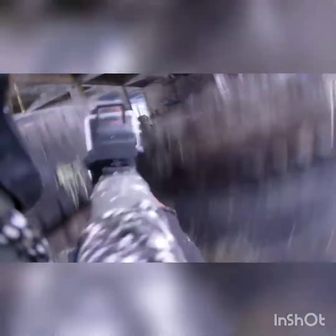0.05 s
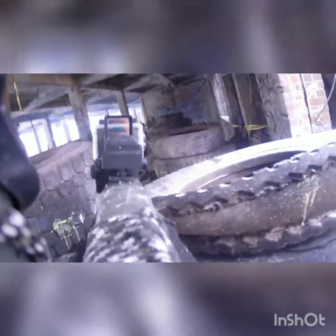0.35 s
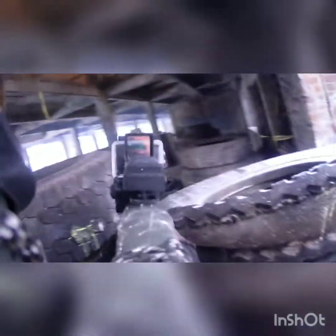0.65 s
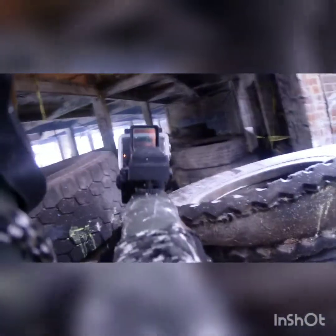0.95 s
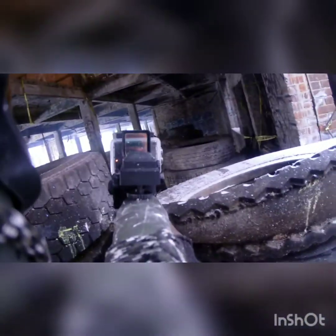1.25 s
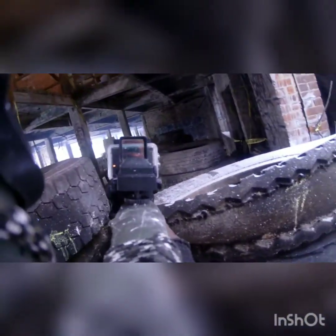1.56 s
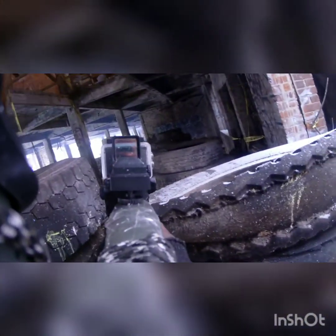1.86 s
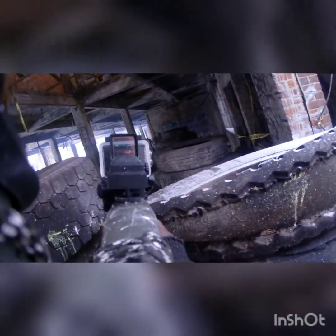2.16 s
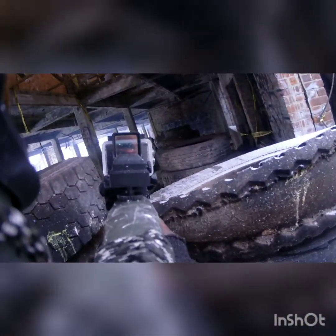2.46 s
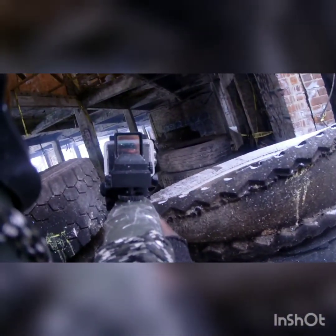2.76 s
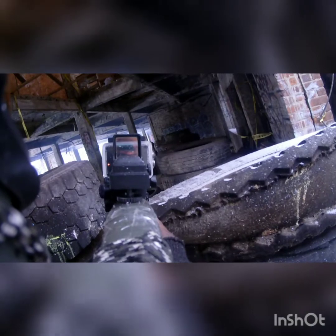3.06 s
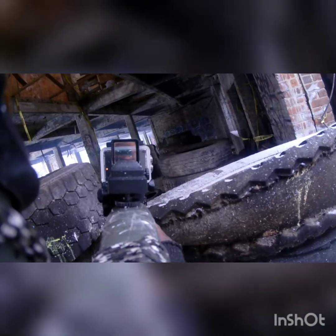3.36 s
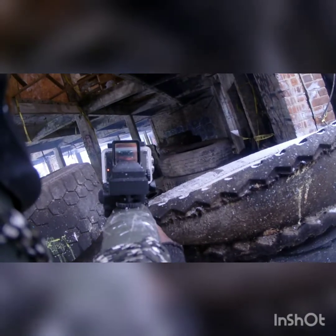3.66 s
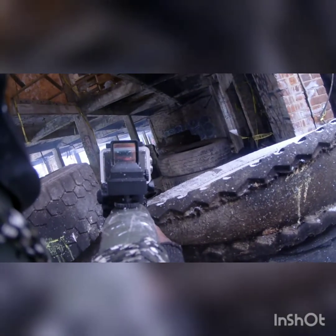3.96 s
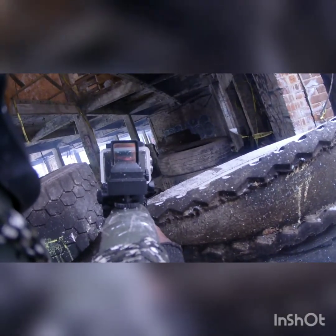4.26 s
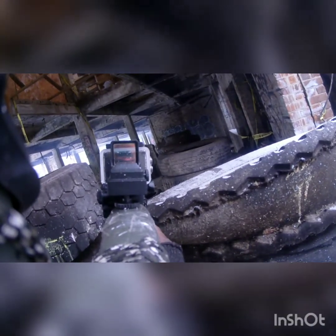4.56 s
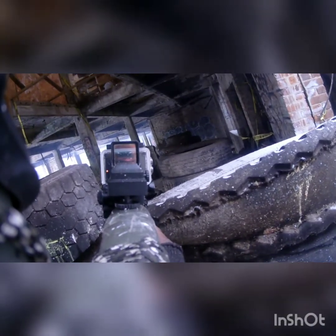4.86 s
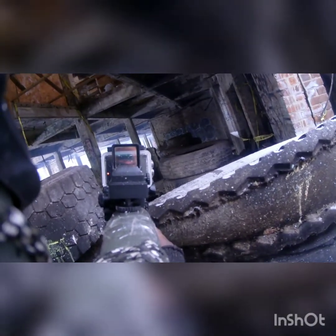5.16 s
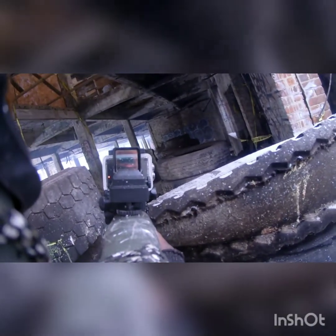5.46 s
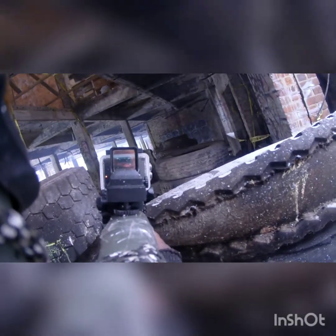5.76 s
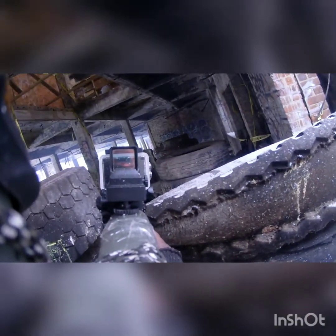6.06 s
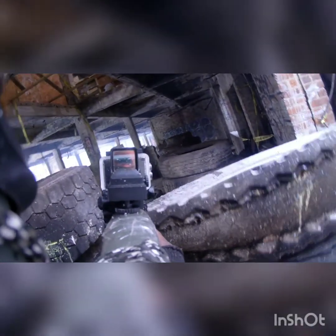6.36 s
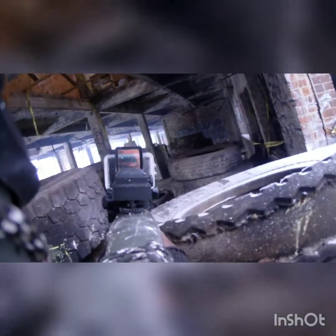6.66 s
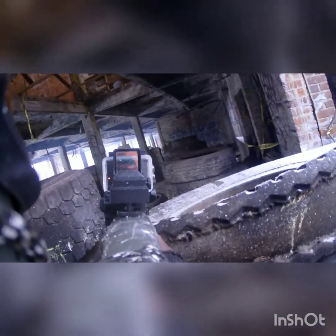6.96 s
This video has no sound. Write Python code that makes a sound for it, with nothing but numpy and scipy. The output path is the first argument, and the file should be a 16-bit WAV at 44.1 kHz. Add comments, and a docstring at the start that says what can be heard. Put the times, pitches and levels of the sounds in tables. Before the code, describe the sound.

Close knocks and scrapes, then scattered echoing airsoft pops in a derelict hall, with two sharp shots clacking right at the microphone.

```python
"""An airsoft gun fires twice right under the microphone: trigger snap, overloading blast, clack of the action.
The place is a derelict hall during a skirmish. The microphone rides on the gun, which first knocks
and scrapes as it settles on a stack of tyres. Other guns pop across the hall and pellets tick on
the far walls, over dull room tone, a low hum and two faint, distant tones."""
import sys
import numpy as np
from scipy import signal
from scipy.fft import rfft, irfft, next_fast_len
from scipy.io import wavfile

SR = 44100
rng = np.random.default_rng(int(sys.argv[2]) if len(sys.argv) > 2 else 0)


def unload_wav(signal):
    """Save mono or channel-first audio to the path in sys.argv[1] as 16-bit WAV at rate SR, clipped to [-1, 1]."""
    wavfile.write(
        sys.argv[1],
        SR,
        np.round(np.clip(np.atleast_2d(signal).T, -1, 1) * 32767).astype(np.int16),
    )


N = 309141

# modes of the gun's shell: (frequency [Hz], level [dB], base t60 [s])
SHELL_MODES = [(1040, -7, .02), (1240, -1, .022), (1490, -3, .02), (1950, -7, .014), (2250, 1, .014),
               (2680, -6, .012), (4570, 0, .01), (5550, -4, .008), (7580, -6, .008), (9400, -11, .006),
               (11430, -12, .006)]
# spectrum of a muzzle pop in the hall: (frequency [Hz], level [dB])
POP_SPECTRUM = [(30, -27), (80, -13.5), (150, -6), (300, -5.5), (550, -4.5), (1000, -4), (1550, -8.5),
                (2150, -6.5), (2800, -17.5), (4000, -20), (5400, -25), (7000, -29), (10000, -37),
                (16000, -50.5)]
# shots under the microphone: (time [s], tail level [dB], action shuts after [s], trigger resets after [s])
CLOSE_SHOTS = [(2.7135, -18.2, .1027, .4587), (4.9415, -16.6, .1179, .4865)]


def undb(db):
    """Decibels to gain."""
    return 10 ** (np.asarray(db) / 20)


def unit(x):
    """Scale to rms 1."""
    return x / np.sqrt(np.mean(x ** 2))


def freqs(size):
    """Frequencies of the spectrum of so many samples."""
    return np.maximum(np.fft.rfftfreq(size, 1 / SR), 1)


def curve(table, f):
    """Join (Hz, value) points on a log-frequency axis."""
    hz, value = np.transpose(table)
    return np.interp(np.log(f), np.log(hz), value)


def shelf(f, corner_hz):
    """Rises from 0 below the corner to 1 above it."""
    return f ** 4 / (f ** 4 + corner_hz ** 4)


def boosts(resonances, f):
    """Summed boost in dB of bell-shaped resonances."""
    return sum(db / (1 + (2 * (f - hz) / width_hz) ** 2) for hz, width_hz, db in resonances)


def wander(rate_hz):
    """A random motion of spread 1 whose changes roll off above the rate."""
    size = next_fast_len(N, True)
    slow = 1 - shelf(freqs(size), rate_hz)
    return unit(irfft(rfft(rng.standard_normal(size)) * slow, size))[:N]


def add(track, s, sound):
    """Mix a sound into the track at time s."""
    start = int(s * SR)
    first, last = max(start, 0), min(start + len(sound), N)
    track[first:last] += sound[first - start:last - start]


def cover_db(f):
    """Standing waves in the cover around the microphone colour what comes from the hall."""
    # (frequency [Hz], width [Hz], boost [dB])
    standing_waves = [(155, 13, 2.5), (241.3, 25, 4), (306, 20, 6), (374, 29, 3), (480, 30, 2.5),
                      (593, 22, 5), (770, 77, 1), (866, 23.9, 3.5), (983, 20, 1), (1340, 8.6, -3),
                      (1642, 40, 2), (1892, 27, 4.5), (2084, 130, 5.5)]
    return boosts(standing_waves, f)


def room_tone(level_db=-44.5, waver_db=1.5):
    """The hall's dull, wavering background, heard from behind the cover."""
    # (frequency [Hz], level [dB])
    air_spectrum = [(20, -11.5), (35, 3.5), (85, -2), (130, -6.5), (250, -6.5), (450, -6.5), (650, -7),
                    (930, -4.5), (1400, -18.5), (2050, -22), (2700, -31), (4000, -34.5), (7000, -43.5),
                    (16000, -48)]
    size = next_fast_len(N, True)
    f = freqs(size)
    colour_db = curve(air_spectrum, f) + cover_db(f) / 2
    air = unit(irfft(rfft(rng.standard_normal(size)) * undb(colour_db), size))[:N]
    return air * undb(level_db - waver_db * wander(13.4))


def hum(hz, width_hz, level_db):
    """An unsteady tone: a narrow band of noise around one pitch."""
    t = np.arange(N) / SR
    drift = wander(width_hz) + 1j * wander(width_hz)
    return undb(level_db) * unit(np.real(drift * np.exp(2j * np.pi * hz * t)))


def ring(force, modes, treble_db, length, crack_db=0, scatter_db=2, crack_s=.0018, crack_hz=5000):
    """A force rings the modes of a part; each contact point weights them anew, a hard one adds treble."""
    t = np.arange(SR // 10) / SR
    response = np.zeros(len(t))
    for (hz, db, t60), (weight, detune) in zip(modes, rng.standard_normal((len(modes), 2))):
        gain = rng.choice([-1, 1]) * undb(db + scatter_db * weight)
        decay = undb(-60 * t / (t60 * length))
        response += gain * np.sin(2 * np.pi * hz * (1 + .011 * detune) * t) * decay
    # countless weak, heavily damped modes make a short crack
    pole = np.exp(-2 * np.pi * crack_hz / SR)
    crack = rng.standard_normal(len(t)) * np.exp(-t / crack_s)
    response += undb(crack_db) * signal.lfilter([1 - pole], [1, -pole], crack)
    # small parts radiate little bass
    response = signal.sosfilt(signal.butter(1, 500, "highpass", fs=SR, output="sos"), response)
    response = irfft(rfft(response) * undb(treble_db * shelf(freqs(len(t)), corner_hz=3300)))
    return signal.fftconvolve(force, response[:len(t) // 2])


def scrapes(slips_per_s=2200, uneven_db=4, shell_db=-4):
    """The gun sticks and slips on the rubber: dense clicks, heard directly and through its shell."""
    # (time [s], swell [s], fade [s], top rms level [dB], treble [dB])
    slides = [ (-.02, .03, .055, -27.5, -21), (.075, .025, .012, -38, -14), (.167, .022, .02, -34, -8),
              (.513, .03, .05, -31.5, -21), (.797, .05, .014, -37, -7), (.991, .012, .025, -45, -28)]
    # (frequency [Hz], level [dB])
    rub_spectrum = [(300, -26), (750, -13), (1120, 4), (1550, -14), (2200, -6), (3500, -13.5), (5000, -7),
                    (6500, -19), (10000, -17), (16000, -35)]
    out, f, t = np.zeros(N), freqs(SR), np.arange(SR) / SR
    for s, swell_s, fade_s, db, treble_db in slides:
        speed = np.minimum(np.sqrt(t / swell_s), np.exp(-np.maximum(t - swell_s, 0) / fade_s))
        slips = (rng.random(SR) < slips_per_s / SR) * rng.choice([-1, 1], SR)
        force = speed * slips * undb(uneven_db * rng.standard_normal(SR))
        colour_db = curve(rub_spectrum, f) + treble_db * shelf(f, corner_hz=2900)
        rub = irfft(rfft(force) * undb(colour_db))
        shell = ring(force, SHELL_MODES, treble_db, length=1, crack_db=1)[:SR]
        sound = unit(unit(rub) + undb(shell_db) * unit(shell))
        add(out, s, undb(db) * sound * np.sqrt(np.mean(speed ** 2)))
    return out


def impacts(hits, modes, chatter, graze_db=-17, graze_s=.00094):
    """Two parts graze, meet hard, then chatter briefly against each other."""
    lead = SR // 200
    out, t = np.zeros(N), np.arange(-lead, SR // 20) / SR
    for s, peak_db, treble_db, contact_s, length in hits:
        graze = undb(graze_db) * np.exp(-np.abs(t) / graze_s)
        contact = np.where(t < 0, graze, np.exp(-np.abs(t) / contact_s))
        force = chatter * rng.standard_normal(len(t)) * contact
        force[lead] = 1  # the blow itself
        sound = ring(force, modes, treble_db, length)
        add(out, s + t[0], undb(peak_db) * sound / np.abs(sound).max())
    return out


def knocks(contact_s=.0005, contact_power=-.25, rattle_count=5, settled_s=1.1, rattle_db=-46):
    """The shell knocks on the tyre and its fittings rattle; the harder the hit, the shorter the contact."""
    # (time [s], peak [dB], treble [dB], ring length [factor])
    bumps = [ (.0995, -25, 12.5, .5), (.1586, 3, 0, .73), (.1785, -3.5, -19, 1.1), (.1875, -19.5, 11, .6),
             (.4322, -26.5, -1, .63), (.5562, -11, 5, .73), (.5772, -12, -11, .45), (.6145, -34, -10, .9),
             (.853, -5, 2, 1.2), (.8948, -16, -11, .25)]
    # dull modes of the tyre: (frequency [Hz], level [dB], base t60 [s])
    tyre_modes = [(390, -18, .018), (720, -14, .012)]
    rattles = [(settled_s * rng.random(), rattle_db + 2 * rng.standard_normal(), -3, .7)
               for _ in range(rattle_count)]
    hits = [(s, db, treble_db, contact_s * undb(db) ** contact_power, length)
            for s, db, treble_db, length in bumps + rattles]
    return impacts(hits, SHELL_MODES + tyre_modes, chatter=.33)


def far_tones(tone_hz=402, tone_db=-53.5, start_s=.93, end_s=2.6, fade_s=.16,
              sag_hz=54, sag_at_s=1.55, sag_width_s=.31, whine_start_s=5):
    """A faint, distant tone sags once and recovers; later a higher whine fades in and stays."""
    t = np.arange(N) / SR
    pitch_hz = tone_hz - sag_hz * np.exp(-((t - sag_at_s) / sag_width_s) ** 2)
    held = np.clip(np.minimum(t - start_s, end_s - t) / fade_s, 0, 1)
    blur = 1.04 * wander(9.9)  # many paths through the hall smear the phase
    tone = undb(tone_db) * held * unit(np.sin(2 * np.pi * np.cumsum(pitch_hz) / SR + blur))
    whine = hum(hz=651.4, width_hz=2.5, level_db=-56)
    return tone + whine * np.clip((t - whine_start_s) / fade_s, 0, 1)


def hall_burst(colour_db, early_db, early_t60, rise_s, lumpy, merge_s):
    """A pop in the hall: strong, separate early reflections merge into a tail that loses treble first."""
    # (frequency [Hz], t60 [s])
    reverb_times = [(100, 1.14), (400, 1.126), (1000, 1.056), (2200, 0.78), (5000, 0.54), (9000, 0.42),
                    (15000, 0.54)]
    size = 2 * (len(colour_db) - 1)
    t, f = np.arange(size) / SR, freqs(size)
    spread = lumpy * np.exp(-t / merge_s)
    noise = rng.standard_normal(size)
    lumps = np.exp(spread * np.clip(rng.standard_normal(size), -2, 2) - spread ** 2)
    reflections = unit(irfft(rfft(noise * lumps) * undb(colour_db)))
    spectrum = rfft(reflections)
    band_hz, band_t60 = np.transpose(reverb_times)
    tail = np.zeros(size)
    for share, t60 in zip(np.eye(len(band_hz)), band_t60):
        band = irfft(spectrum * curve(np.c_[band_hz, share], f))
        tail += band * undb(-60 * t / t60)
    early_lift = np.hypot(1, undb(early_db - 60 * t / early_t60))
    return tail * early_lift * (1 - np.exp(-t / rise_s))


def muzzle_pops(close_rise_s=.0008, close_treble_db=-2, ripple_db=2, ripple_hz=70):
    """Each shot, distant or close, is coloured by its gun's body and by the cover it passes."""
    # pops across the hall: (time [s], timbre, tail level [dB], build-up [s], treble [dB])
    # the bright swell at 3.893 s is the hard shot echoing off the far wall
    distant = [ (1.393, "sharp", -21.8, .002, 5), (1.654, "far", -26, .025, 8),
               (2.280, "far", -37.3, .08, 10), (2.455, "heavy", -21, .003, 0),
               (2.590, "heavy", -25.3, .025, 8), (3.498, "far", -29.3, .005, -2.5),
               (3.695, "far", -27, .002, 3), (3.835, "hard", -15.5, .001, 8),
               (3.893, "bright", -13.2, .03, 3), (4.127, "heavy", -29, .016, 3),
               (4.276, "far", -26.5, .025, 1.5), (4.471, "hard", -37, .008, 16),
               (4.845, "heavy", -23, .004, -3), (5.430, "bright", -34.7, .009, -1.5),
               (6.379, "heavy", -36.5, .044, 7)]
    # resonances of each timbre: (frequency [Hz], width [Hz], boost [dB])
    resonances = { "sharp": [(311.3, 42, 3.5), (636, 71, 5), (1076, 270, 10.5), (2056, 79, -2.5),
                  (4810, 76, 6)], "heavy": [(215, 80, 6.5), (500, 59, 9.5), (790, 340, 11),
                  (1760, 530, -6.5), (5380, 440, 0)], "hard": [(461, 220, 12.5), (1370, 400, 8),
                  (2090, 1050, 5), (4260, 980, -4.5), (5470, 980, 7.5)], "far": [(380, 130, 5.5),
                  (600, 270, 4.5), (958, 225, 9.5), (1500, 310, -3.5), (2000, 110, 4.5)],
                  "bright": [(513, 90, 4), (969, 200, 6), (1600, 600, 2.5)], "own": [(133, 35, 4.5),
                  (360, 32, 6.5), (513, 90, 4), (969, 200, 6.5), (1410, 300, 0), (2170, 250, 0)]}
    # how each timbre reaches the microphone: (early sound over tail [dB], early t60 [s], bass [dB])
    arrivals = {"sharp": (4.5, .9, 1), "heavy": (2.5, .5, 2.5), "hard": (-14, .16, 3), "far": (-8, .3, 0),
                "bright": (0, .14, -5), "own": (16.5, .32, -.3)}
    close = [(s, "own", db, close_rise_s, close_treble_db) for s, db, _, _ in CLOSE_SHOTS]
    out, f = np.zeros(N), freqs(65536)
    common_db = curve(POP_SPECTRUM, f) + cover_db(f)
    for s, timbre, db, rise_s, treble_db in distant + close:
        early_db, early_t60, bass_db = arrivals[timbre]
        colour_db = common_db + boosts(resonances[timbre], f)
        colour_db += bass_db * (1 - shelf(f, corner_hz=380)) + treble_db * shelf(f, corner_hz=2300)
        # many small parts ring along, which ripples the upper spectrum
        ripple = np.interp(f / ripple_hz, np.arange(len(f)), rng.standard_normal(len(f)))
        colour_db += ripple_db * ripple * shelf(f, corner_hz=1200)
        pop = hall_burst(colour_db, early_db, early_t60, rise_s, lumpy=.5, merge_s=.042)
        add(out, s, undb(db) * pop)
    return out


def pellets(tail_db=-51.8):
    """Pellets strike far walls with thin, ringing ticks; all fill the hall alike, nearer ones snap more."""
    # (time [s], early sound over tail [dB])
    strikes = [(2.189, -14), (3.173, -3), (5.848, -10), (6.138, 5), (6.186, 19.5), (6.327, 7), (6.401, 14),
               (6.584, 12.5)]
    # (frequency [Hz], level [dB])
    tick_spectrum = [(200, -20.5), (1000, -12.5), (2000, -1), (4000, -12.5), (6000, -20.5), (10000, -34.5),
                     (16000, -32)]
    # (frequency [Hz], width [Hz], boost [dB])
    wall_resonances = [(2090, 90, 9.5), (3020, 70, 7.5), (3820, 57, 8), (4940, 80, 8.5)]
    out, f = np.zeros(N), freqs(32768)
    colour_db = curve(tick_spectrum, f) + boosts(wall_resonances, f)
    for s, early_db in strikes:
        tick = hall_burst(colour_db, early_db, early_t60=.17, rise_s=.00083, lumpy=.9, merge_s=.07)
        add(out, s, undb(tail_db) * tick)
    return out


def gun_action(trigger_lead_s=.0178, rebound_s=.0112):
    """Close up, the trigger snaps, the piston lands and bounces, the action shuts, the trigger resets."""
    # each stroke of the cycle: (peak [dB], treble [dB], contact [s], ring length [factor])
    strokes = {"trigger": (-17.5, 4.5, .01, .6), "piston": (0, 0, .001, .9),
               "rebound": (.5, -3.5, .0045, .9), "shut": (-1, -11.5, .003, .45),
               "reset": (-36, 6.5, .002, .45)}
    # (frequency [Hz], level [dB], base t60 [s])
    action_modes = [(997, -5, 0.034), (2040, -4, .01), (2820, -7, 0.0066), (3970, 3.5, 0.0075),
                    (5160, 3, .008), (6200, -1.5, .005), (8760, -6, 0.0033), (11200, -11.5, .007)]
    hits = []
    for s, _, shut_s, reset_s in CLOSE_SHOTS:
        delays = {"trigger": -trigger_lead_s, "piston": 0, "rebound": rebound_s,
                  "shut": shut_s, "reset": reset_s}
        hits += [(s + delay, *strokes[stroke]) for stroke, delay in delays.items()]
    return impacts(hits, action_modes, chatter=.5)


def scene(echo_db=-20):
    """All sources meet at the microphone; the hall faintly answers the gun's close noises."""
    gun = knocks() + gun_action() + scrapes()
    hall = hall_burst(curve(POP_SPECTRUM, freqs(SR)), early_db=4, early_t60=.2,
                      rise_s=.004, lumpy=.5, merge_s=.05)
    echo = undb(echo_db) * signal.fftconvolve(gun, hall / np.abs(rfft(hall)).max())[:N]
    skirmish = muzzle_pops() + pellets()
    background = room_tone() + hum(hz=62, width_hz=4.8, level_db=-50.5) + far_tones()
    return np.tile(gun + echo + skirmish + background, (2, 1))


def record(dry, ceiling=.34, low_cut_hz=20, top_hz=15600, flutter_hz=400):
    """The microphone overloads into flat tops; the treble's phase flutters between left and right."""
    # stereo width of the treble: (frequency [Hz], side level [dB])
    side_spectrum = [(1400, -78.5), (2800, -52), (4000, -29), (5500, -6), (14000, -7)]
    clipped = dry / (1 + (dry / ceiling) ** 6) ** (1 / 6)
    mid = signal.sosfilt(signal.butter(1, low_cut_hz, "highpass", fs=SR, output="sos"), clipped)
    size = next_fast_len(N, True)
    side_gain = undb(curve(side_spectrum, freqs(size)))
    side = irfft(1j * rfft(mid[0], size) * side_gain, size)[:N] * wander(flutter_hz)
    high_cut = signal.ellip(8, .2, 70, top_hz, fs=SR, output="sos")
    return signal.sosfilt(high_cut, mid + np.array([side, -side]))


dry = scene()
out = record(dry)
unload_wav(out)
```